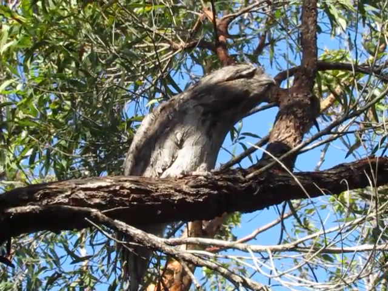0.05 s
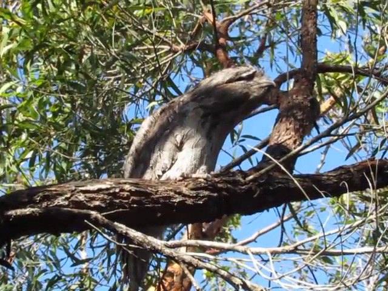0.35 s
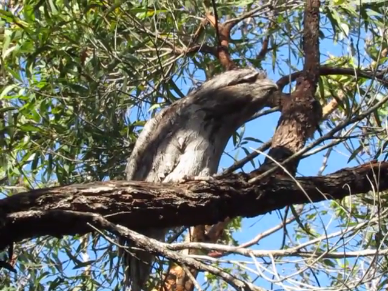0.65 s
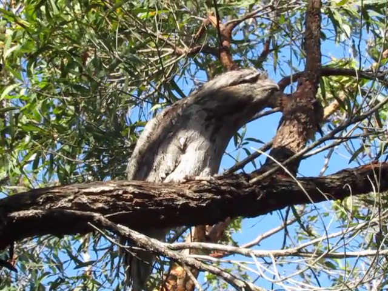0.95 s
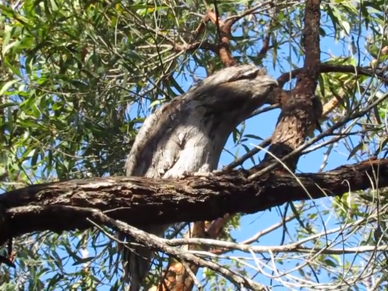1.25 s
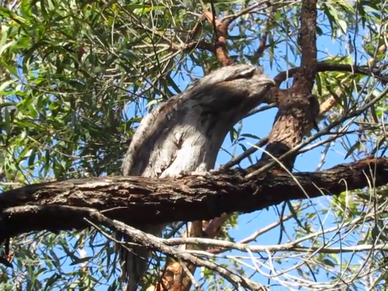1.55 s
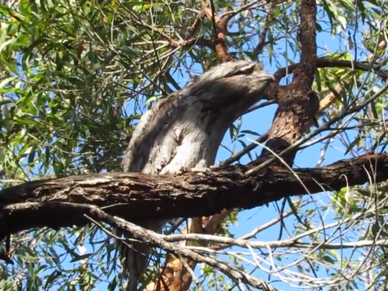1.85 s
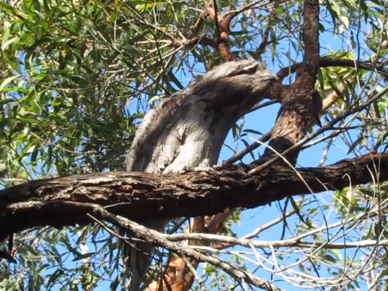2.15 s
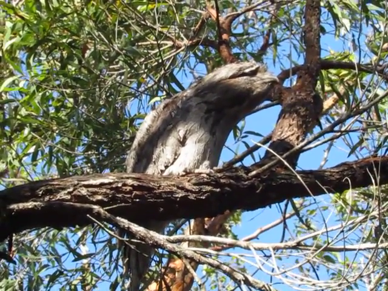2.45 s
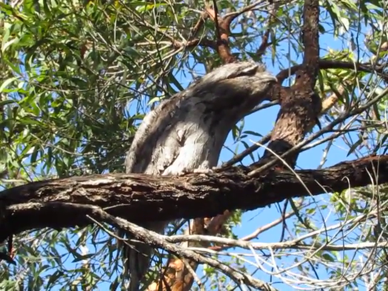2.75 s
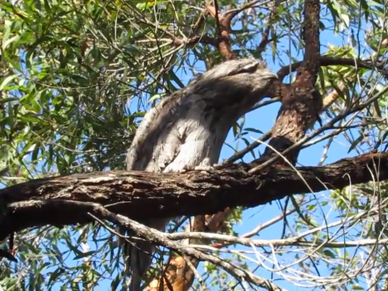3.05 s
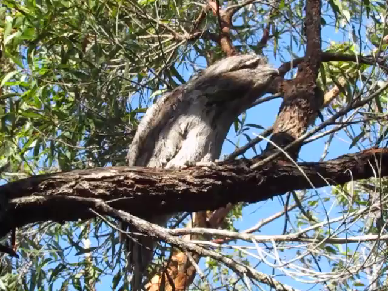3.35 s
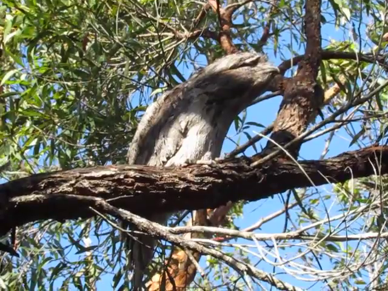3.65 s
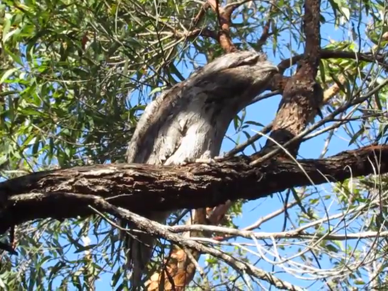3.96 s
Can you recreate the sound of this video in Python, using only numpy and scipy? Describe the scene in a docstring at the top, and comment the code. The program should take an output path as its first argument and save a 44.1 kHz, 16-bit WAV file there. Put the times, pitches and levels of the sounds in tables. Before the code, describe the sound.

A cicada buzzes close to the microphone, shrill and unbroken, over the hiss of many more cicadas among the trees. Faint distant birds give short, slightly echoing whistles now and then, a little clearer in the second half.

```python
"""Among trees, a cicada sings close by: its two tymbals take turns, each buckling in three snaps
that ring its body. Many more cicadas merge into a hiss behind it. Distant birds whistle and slur,
echoing among the trunks. One faint dry tick sounds, and a low rumble of air lies under it all."""
import sys
import numpy as np
from scipy import signal
from scipy.fft import rfft, irfft
from scipy.io import wavfile

SR = 44100
rng = np.random.default_rng(int(sys.argv[2]) if len(sys.argv) > 2 else 0)


def materialize(psi):
    """Save the field psi as 16-bit PCM at rate SR to the path in sys.argv[1].

    A 1-D psi becomes a single channel; in a 2-D psi each row is a channel.
    """
    bounded = np.clip(np.atleast_2d(psi).T, -1, 1)
    quanta = np.round(bounded * 32767).astype(np.int16)
    wavfile.write(sys.argv[1], SR, quanta)


N = 176400
TIME = np.arange(N) / SR
FREQS = np.maximum(np.fft.rfftfreq(N, 1 / SR), 1)


def near_cicada():
    """Tymbal snaps ring the body's resonances; the leaves add a short scatter."""
    # body resonances: f/Hz, width/Hz, relative level/dB, left minus right/dB, swing either way/dB
    resonances = [(3307, 223, -25.5, -2.5, 0), (3556, 98, -33.5, -18.5, -0.5), (3660, 20, -32, -7, 0),
                  (3870, 140, -33, -8.5, -0.5), (4210, 67, -35, -1.6, 0.5), (4707, 125, -25, 6, 0.5),
                  (4995, 183, -27, 2.1, -1), (5430, 64, -40.5, 0, 0.5), (5570, 166, -32.5, 4.5, 3.5),
                  (6120, 244, -33, 2, -1.8), (6685, 239, -45.5, -2, 2.5), (7800, 1840, -39, 2, 0),
                  (8920, 520, -43.5, 6, 1), (11500, 1400, -65, 0, -2), (12915, 1200, -62, 1.9, 4)]
    register_edges_hz, shift_at_s, shift_span_s = (4500, 7200), 2.1, .33
    colour_shift = np.tanh((TIME - shift_at_s) / shift_span_s)  # the timbre tilts once, from -1 to +1
    drives = tymbal_snaps()
    song = 0
    for k, (hz, width, db, pan_db, swing_db) in enumerate(resonances):
        drive = drives[np.searchsorted(register_edges_hz, hz)]
        radius = np.exp(-np.pi * width / SR)
        poles = [1, -2 * radius * np.cos(2 * np.pi * hz / SR), radius ** 2]
        ring = (-1) ** k * rms_one(signal.lfilter([1, 0, -1], poles, drive))  # alternating polarity
        song = song + ring * from_db(db + swing_db * colour_shift) * pan(pan_db)
    return from_db(-.18) * song + from_db(-17) * scatter(song.mean(0), t60_s=.2)


def tymbal_snaps():
    """Two tymbals buckle in turn, three ribs each: a click train for each of the body's registers."""
    # tymbal cycle rate: t/s, f/Hz
    song_rate = [(0.0, 67.98), (0.09, 68.14), (0.31, 67.78), (0.48, 68.13), (0.68, 67.72), (0.8, 67.9),
                 (1.07, 68.07), (1.24, 67.89), (1.5, 68.05), (1.7, 68.01), (1.9, 67.78), (2.2, 67.91),
                 (2.82, 67.89), (2.96, 68.04), (3.26, 68.09), (3.42, 68.01), (3.71, 68.12), (4.0, 67.97)]
    # rib snaps: position/cycles, low drive/dB, middle drive/dB, high drive/dB
    ribs = np.array([(-0.0247, -1.5, -16.6, 1.9), (0.1233, -7.9, 0.6, -1.5), (0.2706, -11.5, -0.4, 2.3),
                     (0.4707, 0.5, -12.2, -6.8), (0.6216, -7.0, 2.2, 2.1), (0.7652, -17.7, 0.4, -6.1)])
    jitter_s, spread_db, band_hz = 3e-6, .5, [2850, 11700]
    cycles = .048 + np.cumsum(np.interp(TIME, *np.transpose(song_rate))) / SR
    snap_cycles = (np.arange(int(cycles[-1]) + 1)[:, None] + ribs[:, 0])
    times = np.interp(snap_cycles, cycles, TIME, left=-1, right=-1)
    times += jitter_s * rng.standard_normal(times.shape)
    force_db = spread_db * rng.standard_normal(times.shape)
    trains = [clicks(times.ravel(), from_db(db + force_db).ravel()) for db in ribs[:, 1:].T]
    return [butter(train, band_hz, "band", order=3) for train in trains]


def far_chorus():
    """Countless distant cicadas blur into a finely fluttering hiss."""
    # hiss spectrum: f/Hz, left level/dB, right level/dB
    spectrum = [(1880, -86, -96), (2300, -102, -82), (2697, -80.5, -70), (3060, -57, -53.5),
                (3520, -59.5, -47), (3680, -58, -55), (4370, -60.5, -55.5), (4790, -48, -57.5),
                (4896, -54, -50), (5420, -62, -64), (6350, -59, -59), (6480, -59, -63),
                (7320, -72.5, -74.5), (9360, -69.5, -71), (10160, -77.5, -79), (11200, -78, -78.5),
                (11800, -81, -85), (13100.0, -80.5, -83.5), (14500.0, -90.9, -89), (15700, -100, -100)]
    # stereo image of the hiss: f/Hz, left-right correlation
    correlation = [(2500, 0.63), (3400, 0.18), (4800, 0.4), (6200, 0.62), (9000, 0.15), (14000, 0.29)]
    stereo_db = np.array([over_hz(spectrum, column=1), over_hz(spectrum, column=2)])
    hiss = stereo_noise(stereo_db + .11, correlation)
    flutter = rms_one(butter(drift(450), 110, "high"))
    return hiss * (1 + .098 * flutter)


def birds():
    """Pure whistles glide through three pitches and echo among the trunks."""
    # whistles: t/s, length/s, start f/Hz, middle f/Hz, end f/Hz, level/dB,
    # left minus right/dB, reverb send/dB
    notes = [(.05, 0.079, 1910, 1850, 1860, -60, 0, -4), (.28, .14, 1675, 1765, 1870, -61, 0, -6),
             (.95, .125, 1990, 1943, 1930, -57.5, 1, -3), (1.62, 0.13, 1986, 1950, 1930, -52, 4, -1),
             (1.849, 0.1, 985, 959, 930, -58, 1, -7), (2.005, .055, 2014, 1644, 1290, -45, -1, 0.5),
             (2.05, 0.043, 1390, 1150, 775, -55, -1, -1), (2.21, 0.11, 958, 957, 965, -55, 0, -11),
             (2.41, 0.075, 1312, 1828, 2050, -43, 3, -2), (2.465, .205, 2086, 2088, 2124, -41, 6, -13),
             (3.175, 0.052, 1790, 1770, 1580, -52, 0, -12), (3.54, .10, 1720, 1810, 1820, -56.5, 1, -10),
             (3.644, 0.12, 1260, 1120, 984, -46, 3, -7), (3.47, .035, 934, 850, 680, -56, 0, -4),
             (3.745, 0.078, 1009, 971, 1004, -48, 3, -0.5), (3.69, 0.087, 1755, 1740, 1560, -56, -3, -2),
             (3.795, 0.037, 1970, 1850, 1530, -51, 0, -8)]
    attack_share, release_s = .24, .014
    waver = 1 + .0057 * drift(41)
    flicker = from_db(3 * drift(43))
    direct, send = np.zeros((2, N)), np.zeros(N)
    for start, length, *pitches_hz, db, pan_db, send_db in notes:
        t = TIME - start
        glide = np.polyfit([0, .5, 1], pitches_hz, 2)
        hz = waver * np.polyval(glide, np.clip(t / length, 0, 1))
        attack = np.clip(t / (attack_share * length), 0, 1)
        release = np.clip((length - t) / release_s, 0, 1)
        tone = np.sqrt(2) * np.sin(2 * np.pi * np.cumsum(hz) / SR)
        note = from_db(db) * flicker * attack * release * tone
        direct += note * pan(pan_db)
        send += note * from_db(send_db)
    return direct + scatter(send, t60_s=.8)


def tick():
    """One dull, dry tick on the right: a fast-dying burst of midrange noise."""
    start_s, decay_s, band_hz = 3.386, .0061, [650, 1800]
    envelope = (TIME >= start_s) * np.exp(-abs(TIME - start_s) / decay_s)
    burst = butter(rng.standard_normal(N) * envelope + 1e-18, band_hz, "band")
    return 2 * from_db(-47.5) * pan(-13) * burst / abs(burst).max()


def air():
    """A faint bed of rumbling air, nearly mono in the bass and wider above."""
    # rumble spectrum: f/Hz, relative level/dB
    spectrum = [(12, -45), (20, -18), (49, -4), (70, -2), (140, -9.5), (174, -7), (202, -8.5), (331, -8),
                (594, -15), (676, -13.5), (958, -16), (1600, -14), (2080, -10), (3520, -120)]
    # stereo image of the rumble: f/Hz, left-right correlation
    correlation = [(30, .99), (70, 0.91), (150, 1), (500, 0.58), (1500, 0.6)]
    rumble = butter(stereo_noise(over_hz(spectrum), correlation), 3000, "low")
    return from_db(-56.5) * rms_one(rumble)


def scatter(x, t60_s):
    """Dense dying echoes from leaves and trunks, different for each ear."""
    t = TIME[:SR]
    build_up = 1 - np.exp(-t / .02)
    tail = rng.standard_normal((2, SR)) * from_db(-60 * t / t60_s) * build_up
    tail /= np.sqrt((tail ** 2).sum(1, keepdims=True))
    return signal.fftconvolve(x[None], tail, axes=1)[:, :N]


def clicks(times, gains):
    """Clicks placed between the samples by a windowed sinc."""
    index = (times * SR).astype(int)[:, None] + np.arange(-7, 9)
    offset = index - times[:, None] * SR
    shape = np.sinc(offset) * np.sinc(offset / 8)
    inside = (index >= 0) & (index < N)
    return np.bincount(index[inside], (gains[:, None] * shape)[inside], N) + 1e-18


def stereo_noise(density_db, correlation):
    """Mid-side noise with a given spectrum and left-right correlation."""
    mid, side = rfft(rng.standard_normal((2, N)))
    alike = np.clip(over_hz(correlation), -1, 1)
    left_right = np.sqrt(1 + alike) * mid + np.sqrt(1 - alike) * side * [[1], [-1]]
    return irfft(from_db(density_db) * left_right, N) * np.sqrt(SR) / 2


def drift(hz):
    """Random modulation at unit rms, rolling off above hz."""
    return rms_one(irfft(rfft(rng.standard_normal(N)) / (1 + (FREQS / hz) ** 2), N))


def over_hz(points, column=1):
    """One column of a spectrum table at every frequency."""
    points = np.array(points)
    return np.interp(np.log(FREQS), np.log(points[:, 0]), points[:, column])


def butter(x, hz, kind, order=2):
    """Butterworth filter."""
    return signal.sosfilt(signal.butter(order, hz, kind, fs=SR, output="sos"), x)


def pan(db):
    """Left and right gains for a level difference."""
    return from_db(np.array([[.5], [-.5]]) * db)


def from_db(db):
    """Decibels to gain."""
    return 10 ** (np.asarray(db) / 20)


def rms_one(x):
    """Scale to unit rms."""
    return x / np.sqrt(np.mean(x ** 2) + 1e-20)


def scene():
    """Cicadas fill the treble; birds, tick and air lie far below them."""
    cicadas = butter(near_cicada() + far_chorus(), hz=2120, kind="high", order=10)
    return cicadas + birds() + tick() + air()


def record(dry):
    """A steep high cut on the whole mix."""
    cutoff_hz = 15700
    return signal.sosfiltfilt(signal.ellip(10, .05, 70, cutoff_hz, fs=SR, output="sos"), dry)


dry = scene()
out = record(dry)
materialize(out)
```